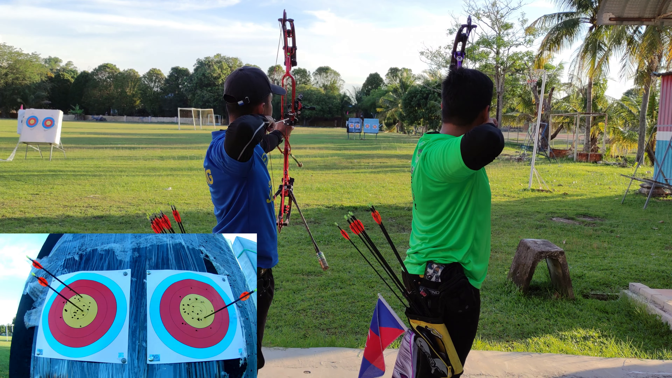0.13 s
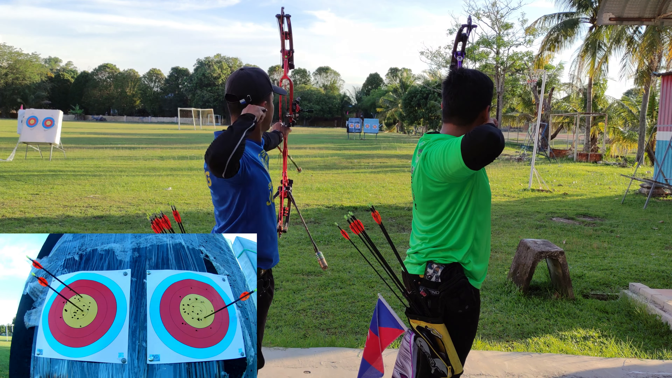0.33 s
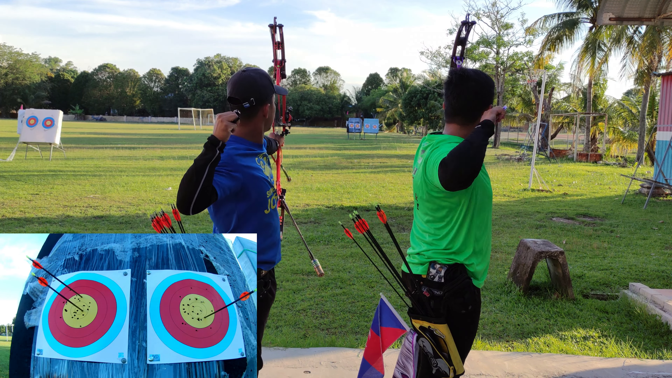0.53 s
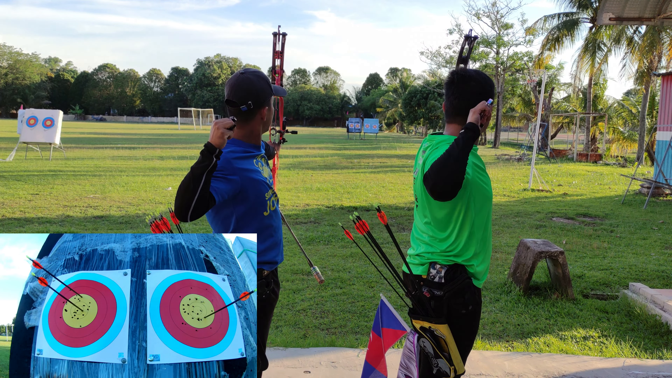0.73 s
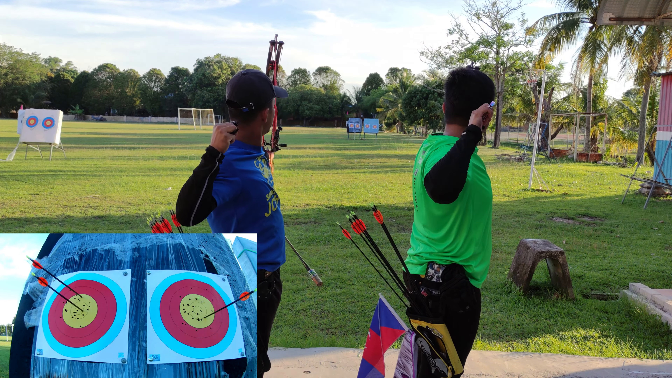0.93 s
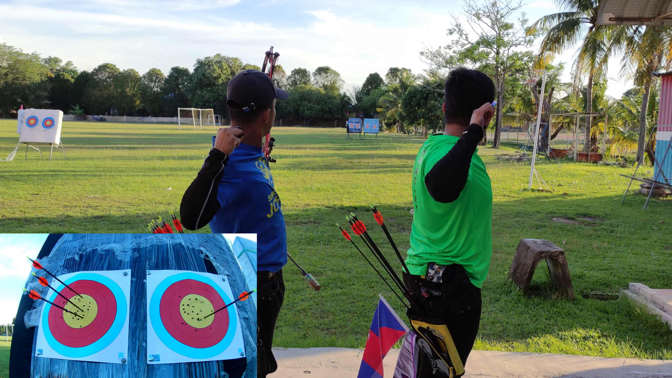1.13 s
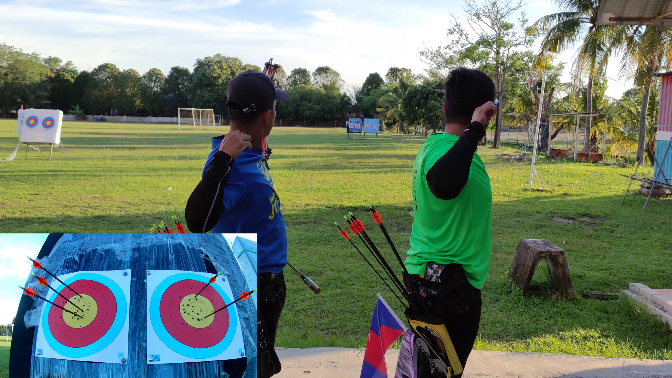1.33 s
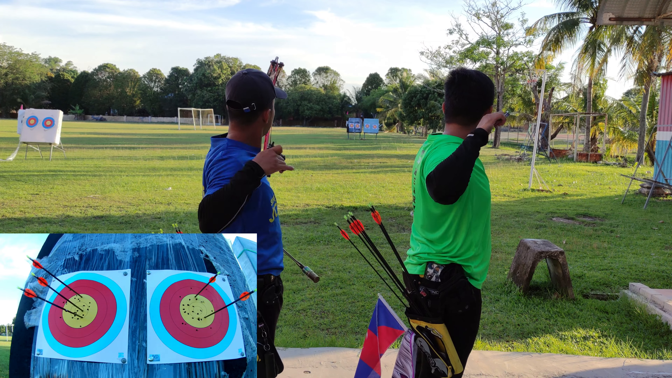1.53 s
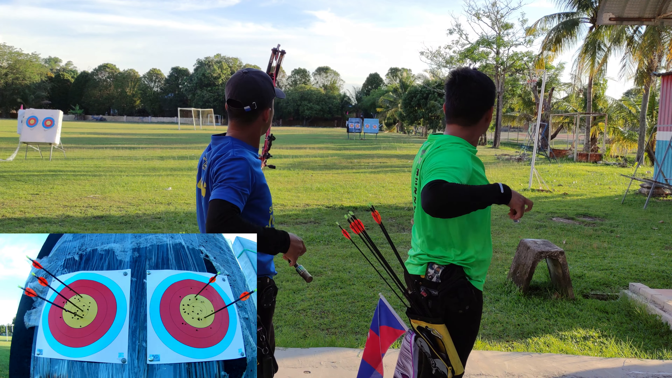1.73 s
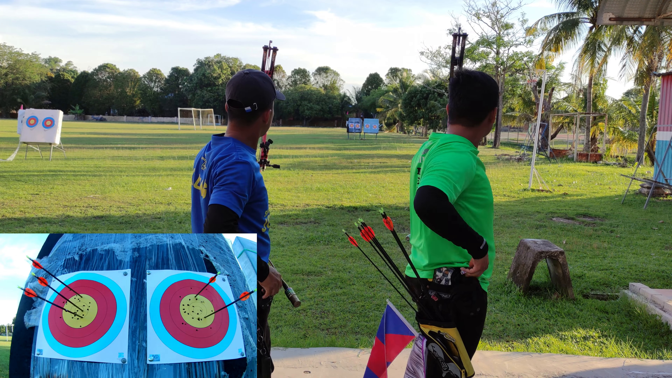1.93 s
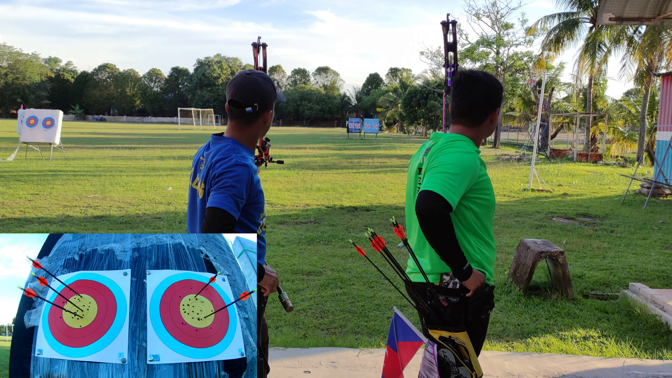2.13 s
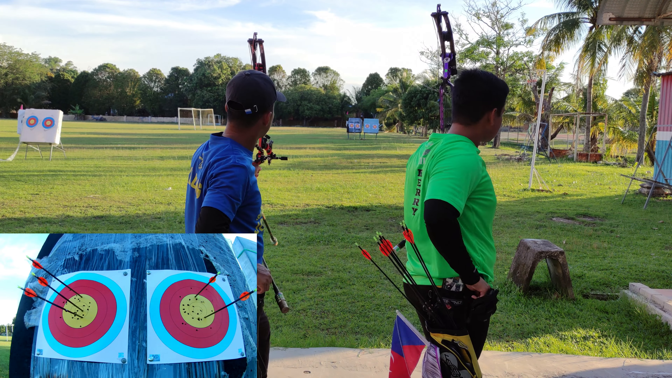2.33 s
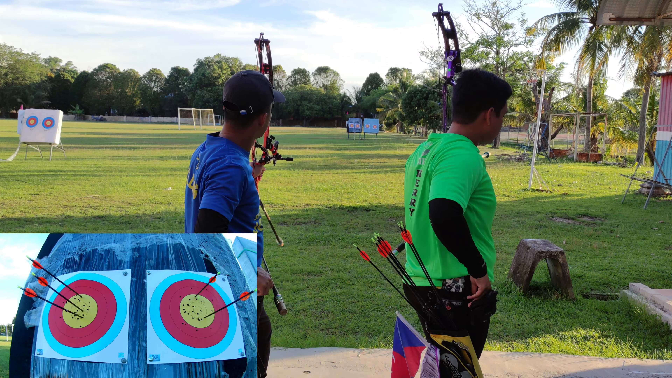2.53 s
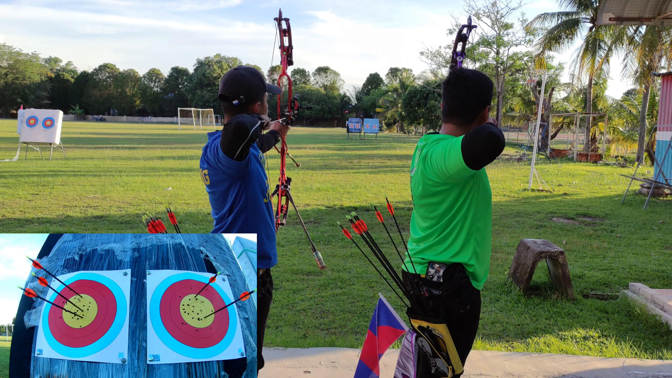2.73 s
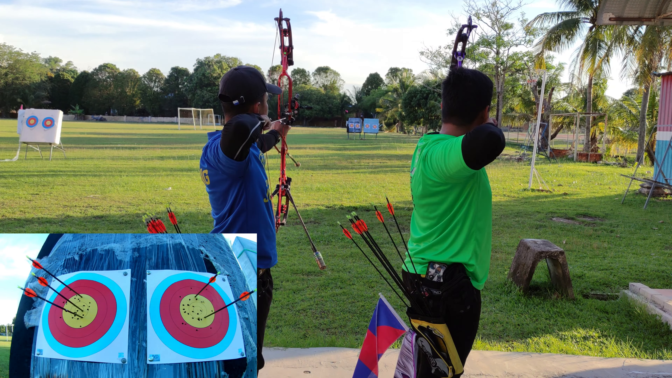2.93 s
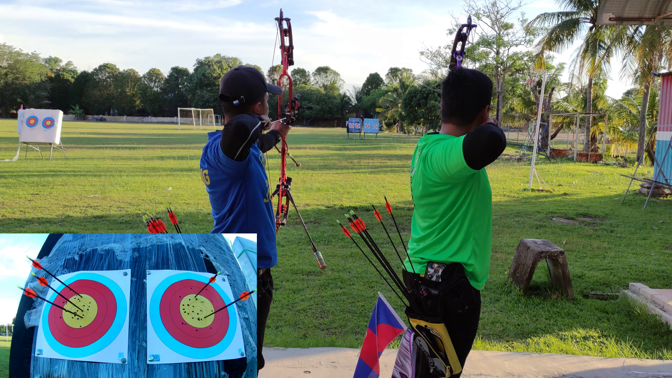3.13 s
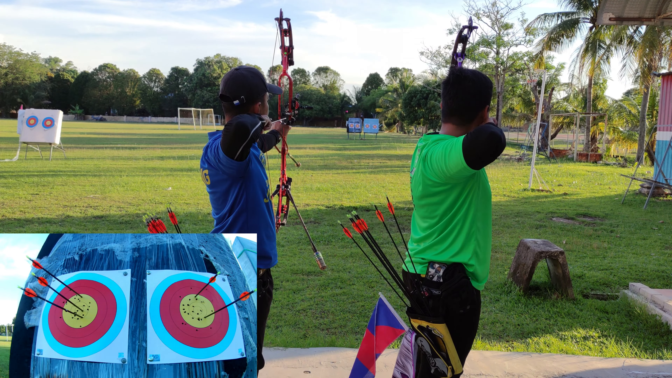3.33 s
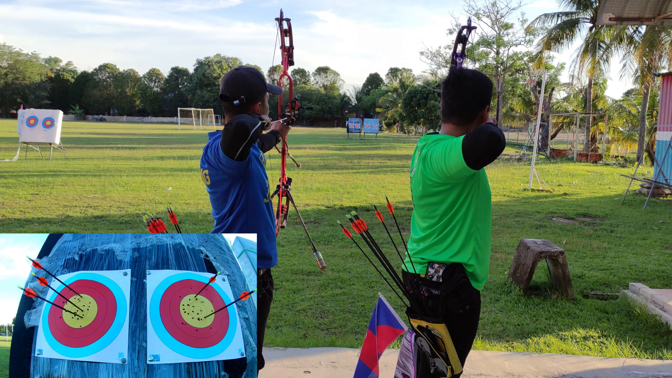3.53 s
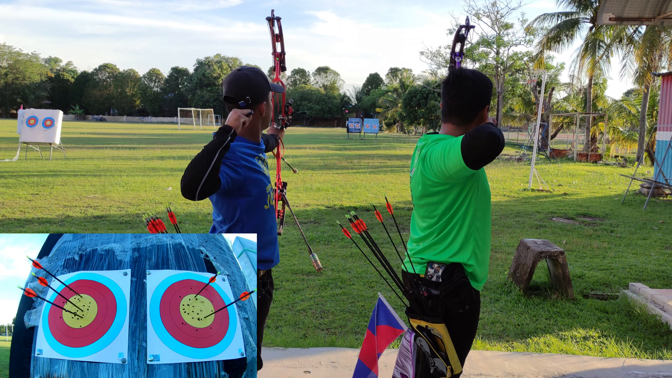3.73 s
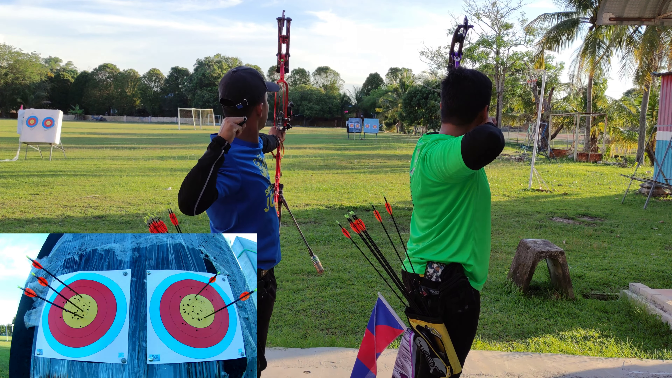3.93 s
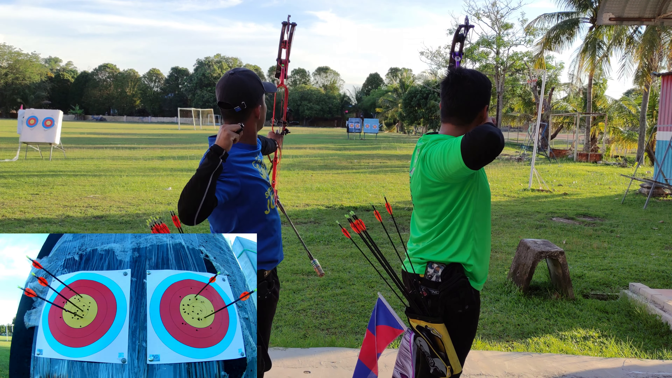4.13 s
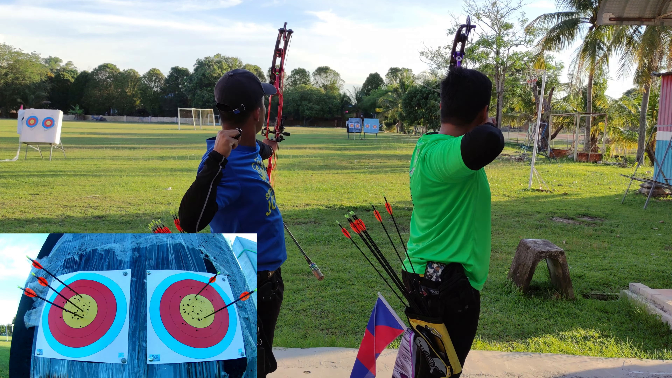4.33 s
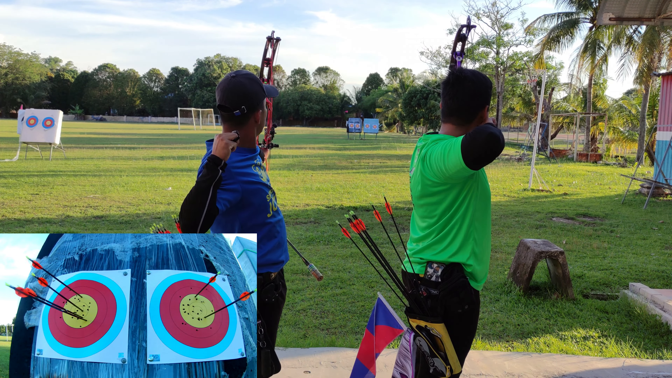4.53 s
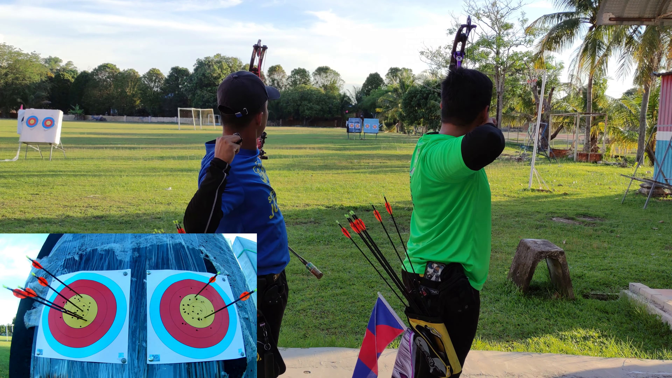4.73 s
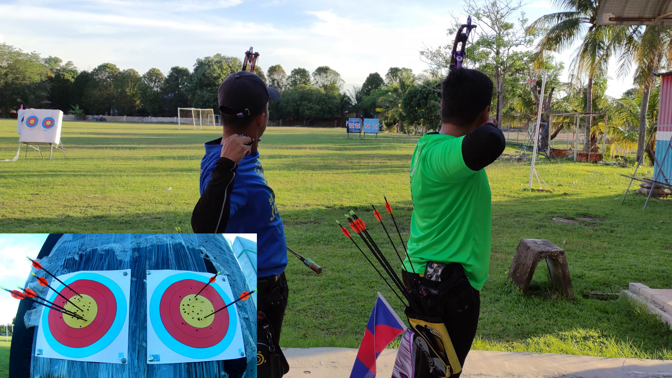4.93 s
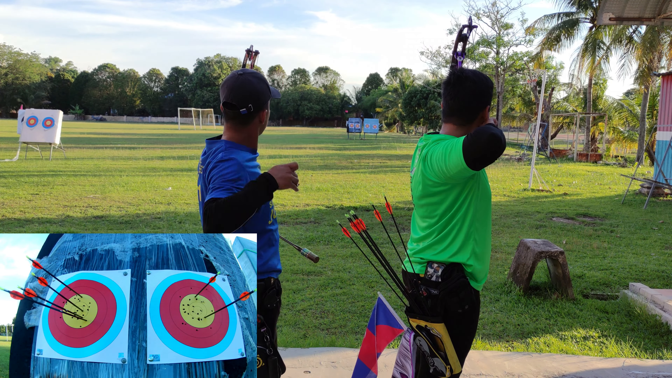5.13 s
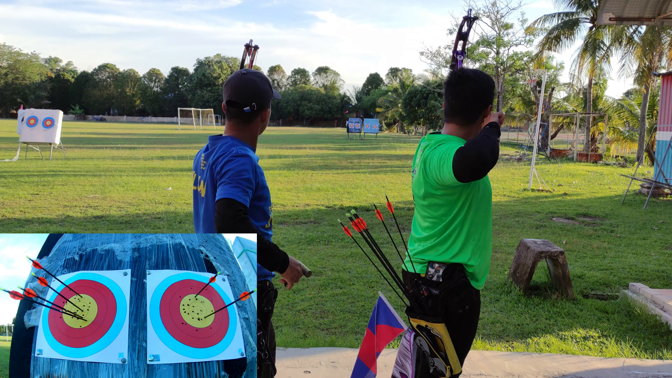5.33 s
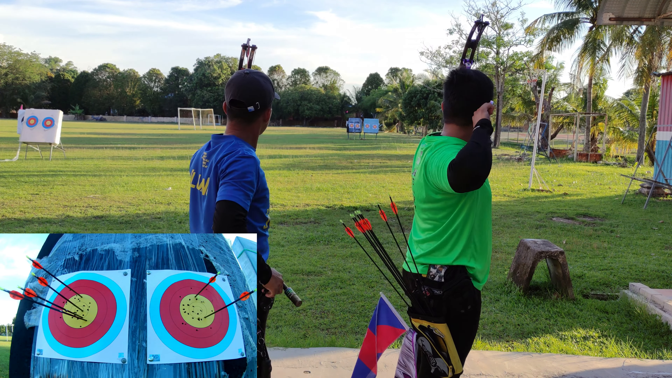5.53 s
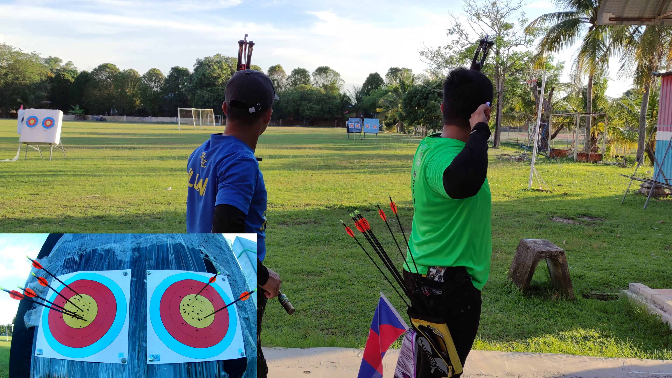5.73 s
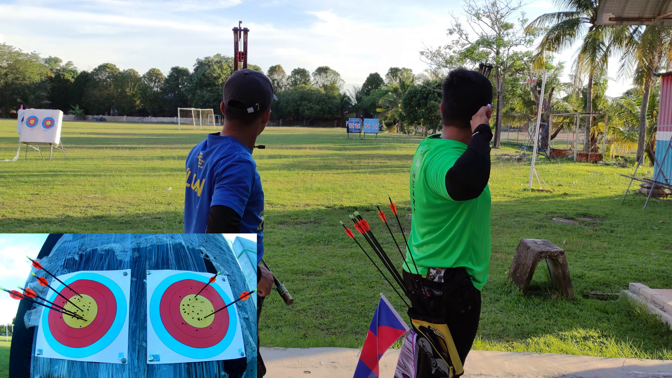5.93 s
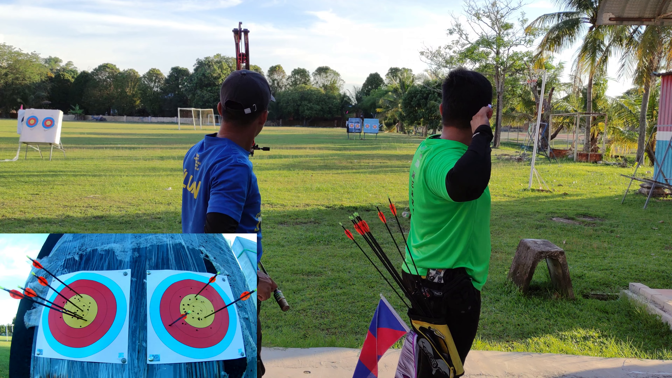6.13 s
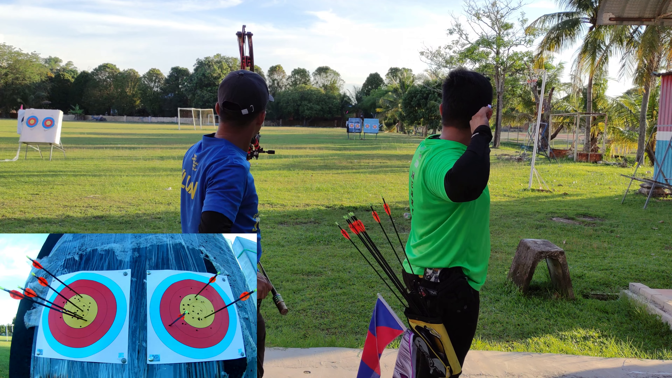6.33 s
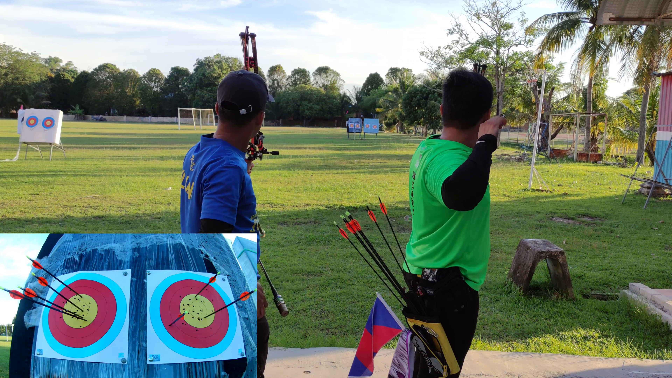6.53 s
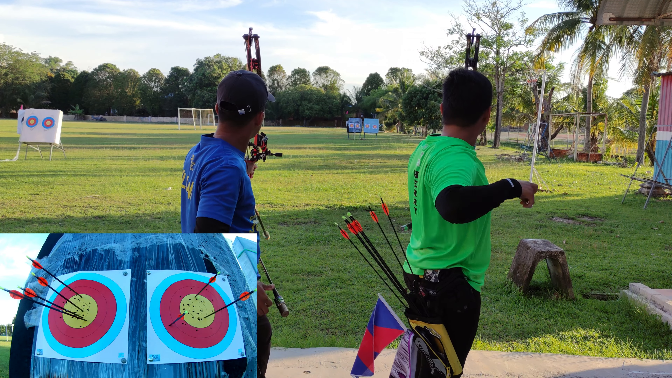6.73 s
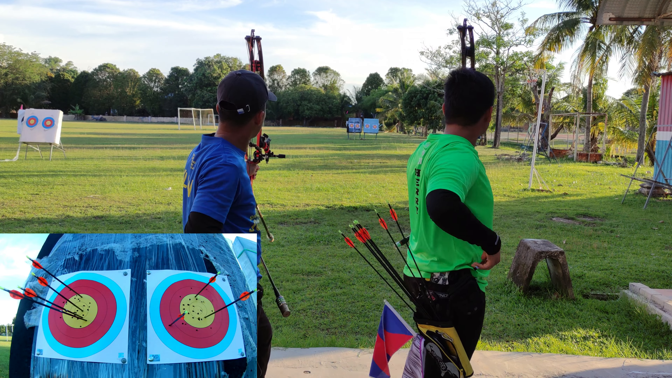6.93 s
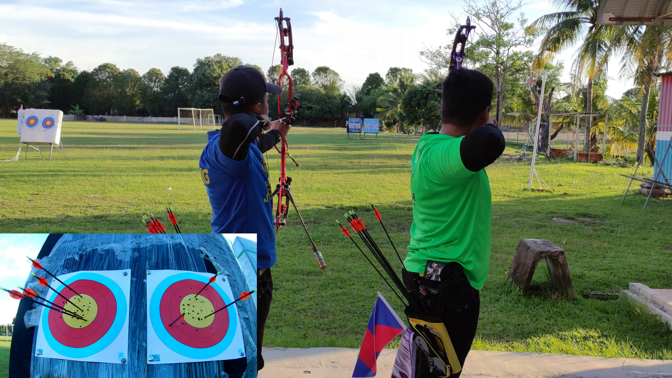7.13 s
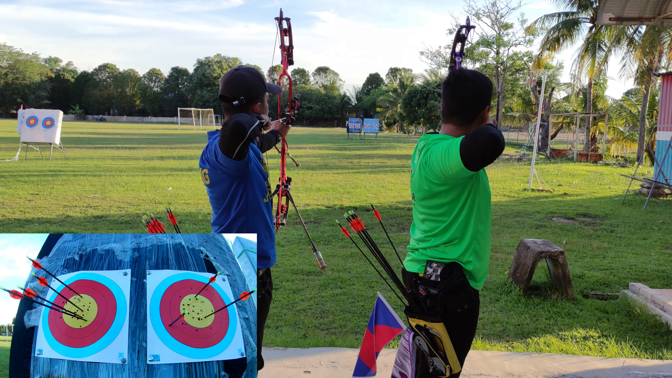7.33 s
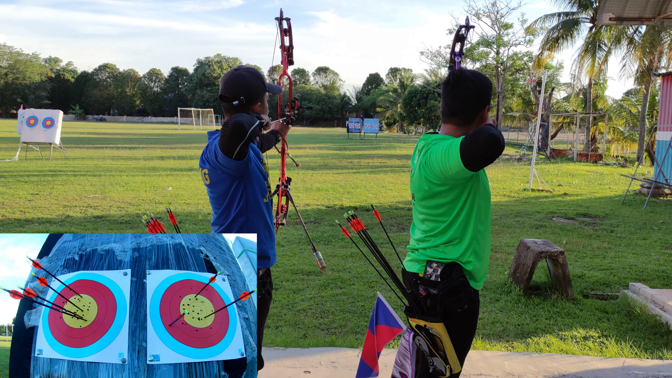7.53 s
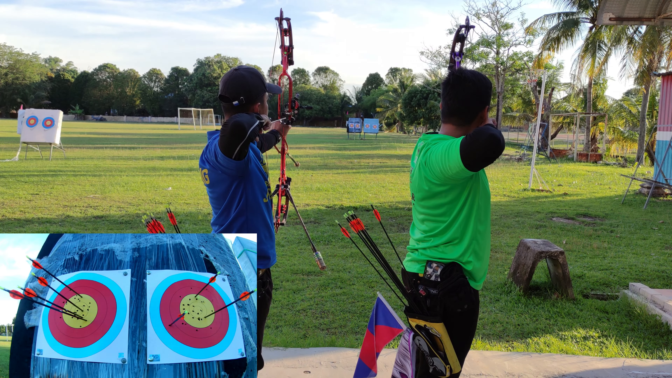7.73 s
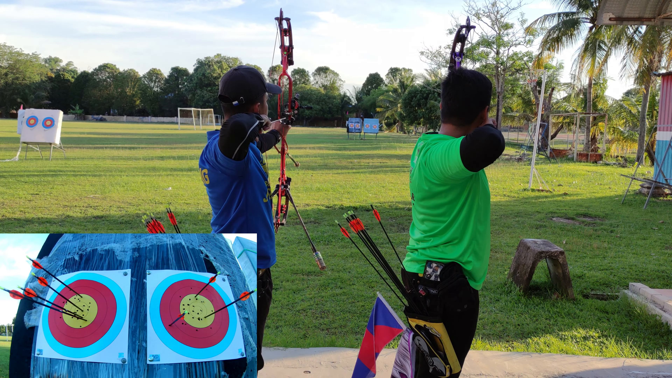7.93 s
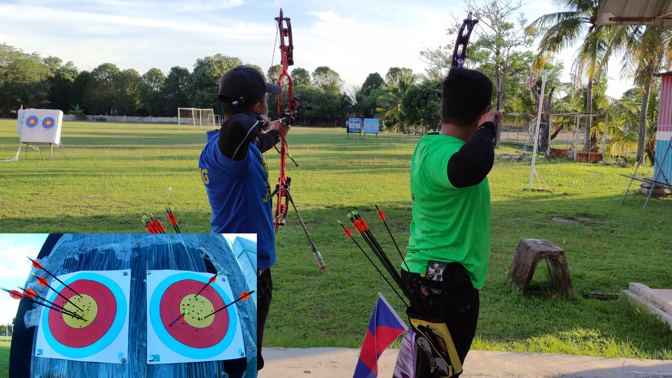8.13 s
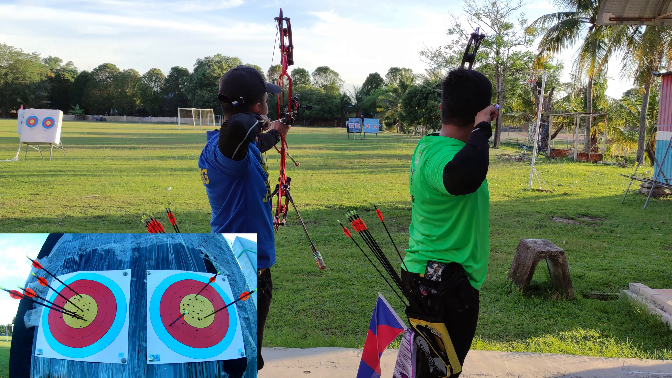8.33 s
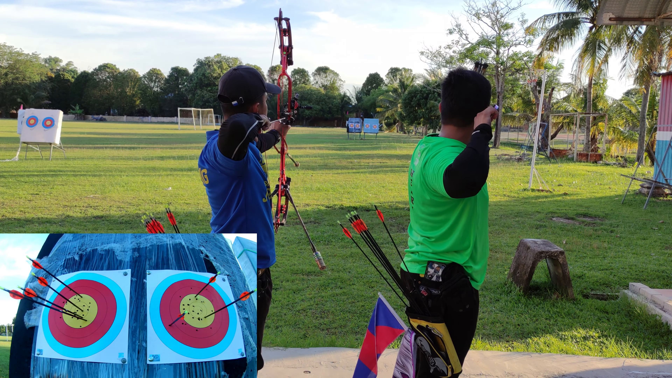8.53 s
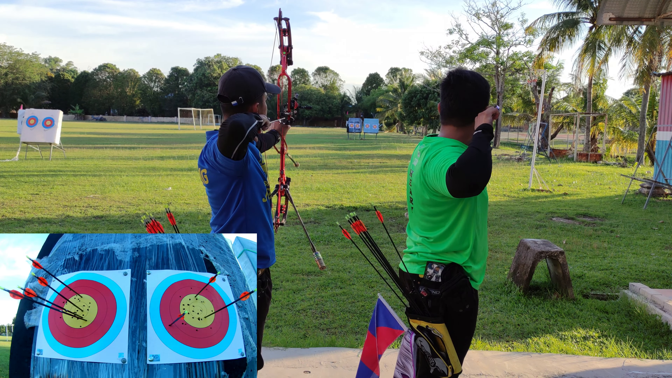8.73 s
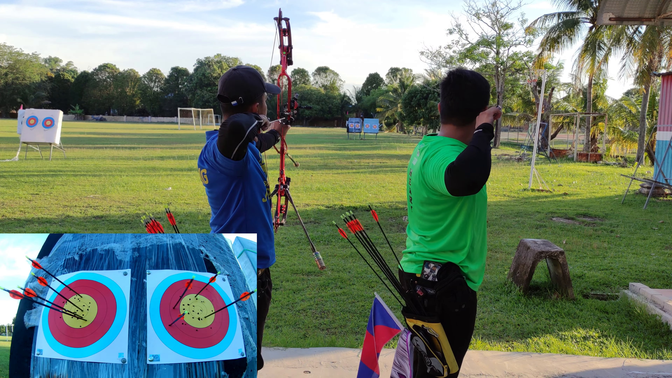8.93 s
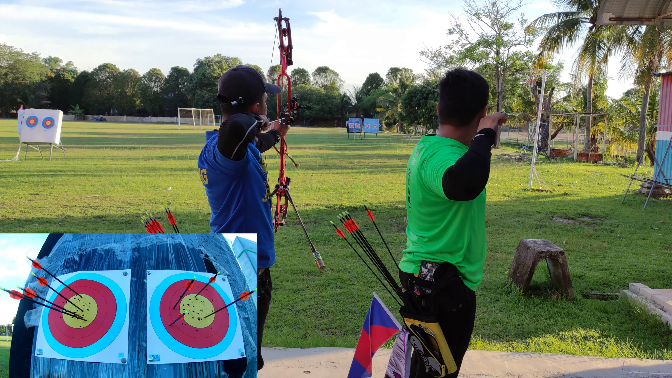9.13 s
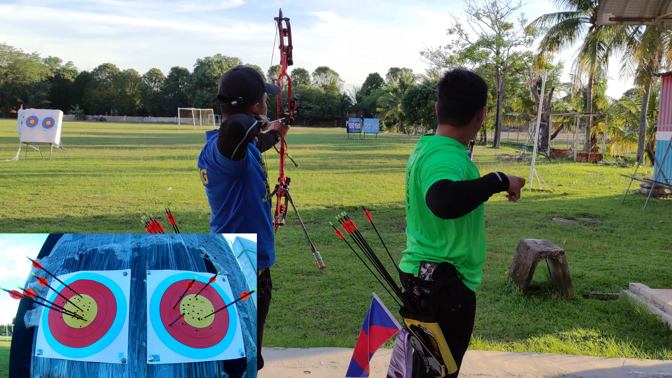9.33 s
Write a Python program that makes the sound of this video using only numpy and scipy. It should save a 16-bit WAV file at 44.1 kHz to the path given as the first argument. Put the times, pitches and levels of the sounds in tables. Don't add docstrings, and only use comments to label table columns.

```python
import sys
import numpy as np
from scipy import signal
from scipy.io import wavfile

SR = 44100
rng = np.random.default_rng(int(sys.argv[2]) if len(sys.argv) > 2 else 0)


def waveform_to_disk(signal):
    frames = np.transpose(np.atleast_2d(signal))
    scaled = np.clip(frames, -1, 1) * 32767
    samples = np.round(scaled).astype(np.int16)
    wavfile.write(sys.argv[1], SR, samples)


def gain_from_decibels(decibels):
    exponent = np.asarray(decibels, float) / 20
    return 10 ** exponent


N = 418509


def rms_one(x):
    return x / np.sqrt(np.mean(x ** 2) + 1e-20)


def in_time(rows):
    s, *columns = np.transpose(rows)
    return [np.interp(np.arange(N) / SR, s, c) for c in columns]


def at_hz(points, hz):
    points = np.array(points)
    return np.interp(np.log(hz), np.log(points[:, 0]), points[:, 1])


def drift(rate):
    r = np.exp(-80 * np.pi * rate / SR)
    white = rng.standard_normal(N // 40 + 2002)
    slow = signal.lfilter([1], [1, -2 * r, r * r], white)[2000:]
    return np.interp(np.arange(N) / 40, np.arange(len(slow)), rms_one(slow))


def noise_bank():
    edges = 20 * 2 ** (np.arange(31) / 3)
    white = rng.standard_normal((2, 2, N))
    bands = []
    for k, pair in enumerate(zip(edges, edges[1:])):
        band_pass = signal.butter(2, pair, "band", fs=SR, output="sos")
        bands.append(signal.sosfilt(band_pass, white[k % 2]))
    return np.sqrt(edges[1:] * edges[:-1]), np.array(bands, np.float32)


def colour(bank, spectrum, alike, lean_db=0):
    hz = bank[0]
    inside = (hz > spectrum[0][0] / 1.13) & (hz < spectrum[-1][0] * 1.13)
    gain = inside * gain_from_decibels(at_hz(spectrum, hz))
    gain = gain / np.sqrt(np.sum(gain ** 2 * hz * .2316 * 2 / SR))
    c = np.clip(at_hz(alike, hz), -.9, 1)
    mix = np.sqrt(np.array([[1 + c, 1 - c], [1 + c, 1 - c]]) / 2)
    mix = mix * np.array([[1, 1.0], [1, -0.96]])[:, :, None]
    return mix * gain * gain_from_decibels(np.array([.5, -.5])[:, None, None] * lean_db)


def steady(bank, spectrum, patchy_db, lean_db=0):
    # f/Hz, correlation/1
    field_alike = [(60, 0.91), (130, 1), (290, 0.86), (640, 0.5), (1410, 0.07), (3100, 0.11), (6820, 0.012),
                   (15000, 0.1)]
    mix = colour(bank, spectrum, field_alike, lean_db)
    out, together = 0, drift(1.5)
    for k in np.flatnonzero(mix[0, 0]):
        level_db = patchy_db * (0.67 * together + drift(13))
        out = out + mix[:, :, k] @ bank[1][k] * gain_from_decibels(level_db)
    return np.roll(out, rng.integers(N), axis=1)


def add(out, s, x):
    i = round(s * SR)
    out[..., i:i + x.shape[-1]] += x[..., :N - i]


def puff(bank, spectrum, t60, rise, alike=None, lean_db=0):
    # f/Hz, correlation/1
    near_alike = [(60, 0.97), (130, 0.98), (290, 0.91), (640, 0.82), (1410, 0.43), (3100, -0.11),
                  (6820, -0.23), (15000, -0.19)]
    # f/Hz, level/dB
    near_lean = [(60, -0.5), (110, -0.5), (200, -1), (380, 0), (700, -1.5), (1290, 1), (2380, -1.5),
                 (4400, -8), (8120, 3), (15000, -10)]
    t = np.arange(round((1.1 * np.max(t60) + .01) * SR)) / SR
    likeness = near_alike if alike is None else alike
    mix = colour(bank, spectrum, likeness, lean_db + at_hz(near_lean, bank[0]))
    used = np.flatnonzero(mix[0, 0])
    decay = gain_from_decibels(-60 * t / (t60 + 0 * bank[0])[used, None])
    start = rng.integers(SR, N - SR)
    bands = bank[1][used, :, start:start + len(t)] * ((1 - np.exp(-t / rise)) * decay)[:, None]
    return np.einsum("cmb,bmt->ct", mix[:, :, used], bands)


def struck(modes, spread_db, soft=0.0, mixed=True):
    t = np.arange(round(.2 * SR)) / SR
    hz, db, t60 = np.transpose(modes)[:, :, None]
    luck = rng.standard_normal((3, len(modes), 1))
    sign = np.where(mixed, np.sign(luck[2]), 1)
    waves = sign * np.sin(2 * np.pi * hz * (1 + 0.024 * luck[1]) * t)
    ring = np.sum(gain_from_decibels(db + spread_db * luck[0] - 60 * t / t60) * waves, axis=0)
    return ring * (1 - np.exp(-t / (soft + 1e-5)))


def glide(first_hz, last_hz, fall, length, rough):
    t = np.arange(round(.1 * SR)) / SR
    white = rng.standard_normal((2, len(t) + 200))
    wobble = signal.lfilter([1], [1, -1.9, .9025], white)[:, 200:]
    wobble = rough * rms_one(wobble) * (1 - np.exp(-t / 0.00055))
    hz = (last_hz + (first_hz - last_hz) * np.exp(-t / fall)) * (1 + 0.44 * wobble[0])
    fade_db = -9 * t / length - 34 * (t / length) ** 2
    return np.sin(2 * np.pi * np.cumsum(hz) / SR) * gain_from_decibels(fade_db) * (1 + wobble[1])


def bows(bank):
    # t/s, trigger level/dB, thump level/dB, roof tail level/dB
    releases = [
        (0.3564, -27, -31, -30.5),
        (0.5125, -25.5, -28, -27),
        (3.6657, -26, -29, -31),
        (5.3631, -25.5, -28, -27.5),
        (8.0965, -25.5, -29, -27),
    ]
    whose = [0, 1, 0, 1, 1]
    # f/Hz, level/dB, t60/s
    bow_modes = [
        [(96, -1.5, 0.034), (243.5, 1, 0.13), (347, -33, 0.0091), (480, -0.5, 0.026), (677, 1.5, 0.036),
         (973, -7, 0.03), (1300, -8, .008)],
        [(85.4, 1.5, 0.026), (234, -5.5, 0.22), (334, 2, 0.05), (517, -1, 0.043), (760, 0.5, 0.025),
         (1036, -1.5, 0.014), (1500, -3, 0.006)],
    ]
    # t after travel/s, level/dB, push or pull/1
    blows = [
        (.0010, -8, -1),
        (.0036, -6, 1),
        (.0054, 2, -1),
        (.0146, -8, -1),
    ]
    # f/Hz, level/dB per Hz
    trigger = [(880, -48), (1500, -6), (2160, -1), (3960, 1), (6000, -3), (6760, 2.5), (8740, -1),
               (16000, -25.5)]
    # f/Hz, level/dB, t60/s
    sear = [(7000, 0, .007), (6500, -4, .007), (4300, -12, .007)]
    # f/Hz, level/dB, t60/s
    jaw = [(2250, 4, 0.26), (3340, -14, 0.085), (5950, -9.5, 0.19), (7300, -10, 0.027), (8700, -1, 0.082),
           (13900, -6, .1)]
    # f/Hz, level/dB per Hz
    rush = [(180, -36), (300, 16.5), (425, 2.5), (502, 9), (885, -1), (978, 2), (1280, -6.5), (2280, -6.5),
            (4370, -16.5), (8090, -15), (12100, -40.5), (14700, -31), (16000, -32)]
    # f/Hz, t60/s
    roof_t60 = [(300, 0.3), (1500, 0.35), (5000, 0.6), (9000, 0.46), (16000, .3)]
    # t60 factor/1, tilt/dB per octave
    slap_place = [(.87, 2.5), (1.05, 4)]
    travel_s = .0154
    out = np.zeros((2, N))
    for (s, db, thump_db, tail_db), bow in zip(releases, whose):
        longer, tilt_db = slap_place[bow]
        add(out, s, gain_from_decibels(db - 13.5) * puff(bank, trigger, .025, .0005))
        add(out, s, gain_from_decibels(db - 8) * puff(bank, trigger, 0.18, 0.0012))
        add(out, s + 0.0012, gain_from_decibels(db - 27.5) * struck(jaw, 0.84) * gain_from_decibels([[-1.5], [1.5]]))
        click = struck(sear, 1.5, soft=.0003) * gain_from_decibels([[2.5], [-2.5]])
        add(out, s + .0017, gain_from_decibels(db - 9.5 + 5.5 * bow) * click)
        limbs = struck(bow_modes[bow], 1.5, soft=0.0002, mixed=False)
        for lag, blow_db, way in blows:
            add(out, s + travel_s + lag, gain_from_decibels(thump_db + blow_db) * np.sign(way) * limbs)
        slap = [(hz, level + tilt_db * np.log2(hz / 3000)) for hz, level in rush]
        tail = puff(bank, slap, longer * at_hz(roof_t60, bank[0]), 0.0021)
        add(out, s + travel_s + .003, gain_from_decibels(tail_db) * tail)
    return out


def target(bank):
    # t/s, entry level/dB, drive-in/s, stop level/dB, butt ring f/Hz
    hits = [
        (1.1373, 4.5, 0.0041, -2.5, 540),
        (1.2496, -2, .0042, 0, 400),
        (4.44715, 5.5, .0060, -3.5, 330),
        (6.0978, 3, .0045, -1.5, 470),
        (8.8335, 5, .0051, -3, 480),
    ]
    # free shaft f/Hz, gripped shaft f/Hz, ring/s, paper crack level/dB, stop f/Hz
    entries = [(1720, 1250, .008, -16, 800), (1900, 1450, .0035, -20, 1000), (1700, 1150, .0075, -17, 750),
               (1550, 1050, .0045, -14, 800), (1600, 950, .0065, -16.5, 850)]
    # f/Hz, level/dB, t60/s
    frame = [(127, -11, 0.1), (292.2, -19.5, 0.2), (398, -5.5, 0.065), (614, -9, 0.059), (865, -3.5, 0.035),
             (1065, -2.5, 0.024), (1265, -14.5, 0.028), (1640, -30, 0.1), (1800, -14, 0.023),
             (2078, -38.5, 0.025), (2560, -44, 0.054), (2859, -24.5, 0.021)]
    # f/Hz, level/dB per Hz
    foam = [(150, -6), (400, 3.5), (900, -0.5), (1800, -4.5), (2800, -22.5), (5000, -45)]
    # f/Hz, level/dB per Hz
    crack = [(1180, -36), (2000, 0.5), (2960, -14.5), (4600, -10.5), (8050, -41.5), (10400, -42),
             (16000, -58.5)]
    # f/Hz, level/dB, t60/s
    face = [(2150, 0, .012), (2600, -3, .012), (3300, -8, .012), (4050, -4, .014), (4700, -5, .014),
            (5300, -9, .012)]
    out = np.zeros(N)
    for hit, entry in zip(hits, entries):
        s, db, delay, stop_db, ring_hz = hit
        free_hz, gripped_hz, entry_s, crack_db, stop_hz = entry
        add(out, s, gain_from_decibels(db) * glide(free_hz, gripped_hz, .002, entry_s, rough=0.28))
        add(out, s + delay, gain_from_decibels(stop_db) * glide(stop_hz, .25 * stop_hz, 0.0007, 0.006, rough=0.2))
        butt_ring = glide(ring_hz, 0.75 * ring_hz, 0.011, 0.036, rough=0.49)
        add(out, s + delay, gain_from_decibels(stop_db - 13.5) * butt_ring)
        add(out, s + .6 * delay, gain_from_decibels(-13) * struck(frame, 2.6, soft=0.0002))
        crush = puff(bank, foam, 0.049, 0.00033, alike=[(20, 0.72), (2e4, 0.81)])[0]
        add(out, s + .001, gain_from_decibels(-14) * crush)
        tear = puff(bank, crack, .015, 0.00027, alike=[(20, 0.97), (2e4, 0.69)])[0]
        add(out, s, gain_from_decibels(crack_db) * tear)
        add(out, s, gain_from_decibels(crack_db - 7) * struck(face, 1.5, soft=0.0002))
    overloaded = 1.166 * np.tanh(out / 1.174)
    return signal.lfilter([.6], [1, -.4], overloaded)


def far_hits(bank):
    # t/s, peak level/dB, tree echo level/dB, echo colour f/Hz
    arrivals = [
        (1.1928, -30, -47.5, 7300),
        (1.3059, -35.5, -51, 4300),
        (4.5021, -29.5, -43.5, 5120),
        (6.1529, -33, -46, 4830),
        (8.8869, -32, -44.5, 4200),
    ]
    # f/Hz, level/dB per Hz
    tick_spectrum = [(700, -4), (1600, 5), (3000, -9), (4700, -2), (6300, -8), (7900, -4), (9500, -22),
                     (16000, -40)]
    # f/Hz, level/dB per Hz
    trees = [(500, 6), (2000, 3), (3000, -14), (4600, -11.5), (6800, -16.5), (9000, -22.5), (16000, -44)]
    out = np.zeros((2, N))
    r = np.exp(-np.pi * 700 / SR)
    for s, db, echo_db, hz in arrivals:
        tick = puff(bank, tick_spectrum, .009, 0.00017, alike=[(20, 1.0), (2e4, 0.81)])
        add(out, s, gain_from_decibels(db + 5.0) * tick)
        echo = puff(bank, trees, 0.67, 0.0055)
        poles = [1, -2 * r * np.cos(2 * np.pi * hz / SR), r * r]
        ringing = signal.lfilter([(1 - r * r) / 2, 0, (r * r - 1) / 2], poles, echo)
        add(out, s + 0.0033, gain_from_decibels(echo_db) * (echo + gain_from_decibels(4.5) * ringing))
    return out


def rattle(bank):
    # t/s, peak level/dB, shaft pitch f/Hz, treble level/dB
    knocks = [(2.0341, -34, 2130, -42.5), (2.1665, -41.5, 2480, -56), (2.2736, -49, 2510, -69),
              (2.2992, -46.5, 2340, -62), (2.3444, -48, 2430, -72), (2.4015, -46, 1980, -64),
              (2.4194, -45, 1970, -68), (2.4938, -37.5, 2780, -54), (2.5227, -40, 2340, -62),
              (2.552, -45, 2410, -67.5), (5.324, -49, 2330, -58), (5.6003, -40, 2820, -48),
              (6.0128, -47, 2770, -62), (6.0268, -40.5, 1915, -57), (6.2127, -38, 2390, -56),
              (6.2158, -36, 2420, -58), (6.2303, -33, 2300, -48), (6.2385, -35, 2400, -44),
              (6.2435, -36, 2400, -52), (6.2505, -40, 2350, -54), (6.3045, -45, 2700, -62),
              (6.5145, -32, 2300, -48), (6.575, -47, 2360, -63), (6.6135, -35, 2300, -47),
              (6.632, -44, 2300, -60), (6.5084, -38, 2740, -57), (6.5117, -36, 2370, -51),
              (6.5836, -48, 2250, -57), (6.6092, -34, 2410, -47), (6.6445, -30.5, 2030, -46),
              (6.6520, -30.5, 2100, -43), (6.673, -38, 2550, -58), (7.295, -53, 2040, -61),
              (7.6779, -54, 2156, -65), (9.4508, -42.5, 2140, -64.5)]
    # t/s, treble level/dB
    buckles = [(1.82, -52.5), (2.0488, -57), (5.289, -62), (5.845, -62), (6.8392, -64), (7.0982, -51.5),
               (7.1073, -48.5), (7.2444, -58.5), (7.7391, -58.5), (8.803, -52), (8.8616, -50),
               (9.4689, -56)]
    # pitch ratio/1, level/dB, t60/s
    shaft_modes = [(1, 4, 0.03), (1.35, -8, .03), (1.75, -8.5, 0.021), (2.4, -16, 0.019)]
    # f/Hz, level/dB, t60/s
    nock = [(8100, 0, .022), (7600, -6, .02), (6250, -8, .03)]
    # f/Hz, level/dB, t60/s
    quiver = [(3330, -3, .2), (3720, 0, .3), (1950, -6, .3)]
    # t/s, level/dB
    quiver_blows = [(6.6527, -55), (6.673, -58), (6.5117, -62)]
    knock_t60 = 0.045
    dull = [(1500, -7), (2300, 0), (3500, -6), (5500, -19.0)]
    bright = [(5000, -5.5), (6500, -4), (8000, 11.5), (10000, -17.5), (16000, -15.5)]
    ticks = [(s, db - 8, 2200, db) for s, db in buckles]
    out = np.zeros((2, N))
    for s, db, hz, treble_db in knocks + ticks:
        lean_db = 1 + 2 * rng.standard_normal()
        half = lean_db / 2
        shaft = [(ratio * hz, level_db, ring) for ratio, level_db, ring in shaft_modes]
        body = struck(shaft, 2.3, soft=.0008) * gain_from_decibels([[half], [-half]])
        add(out, s, gain_from_decibels(db - 4.5) * body)
        add(out, s, gain_from_decibels(db - 6.0) * puff(bank, dull, knock_t60, 0.00069, lean_db=lean_db))
        ping = struck(nock, 2.5, soft=.0006) * gain_from_decibels([[half + 2.5], [-half - 2.5]])
        add(out, s, gain_from_decibels(treble_db + 1.5) * ping)
        add(out, s, gain_from_decibels(treble_db - 1.5) * puff(bank, bright, knock_t60, 0.001, lean_db=lean_db))
        add(out, s, gain_from_decibels(db - 17.5) * puff(bank, dull, 0.33, .008))
        add(out, s, gain_from_decibels(treble_db - 7) * puff(bank, bright, 0.24, 0.016))
    for s, db in quiver_blows:
        add(out, s, gain_from_decibels(db) * struck(quiver, 1.5, soft=.001))
    return out


def drone(rows, orders, unsteady_db):
    hz, db = in_time(rows)
    t = np.arange(N) / SR
    phase = 2 * np.pi * np.cumsum(hz * (1 + .002 * unsteady_db * drift(4))) / SR
    tone = 0
    for k, level_db in orders:
        tone = tone + gain_from_decibels(level_db + unsteady_db * drift(4)) * np.sin(k * phase + k * k)
    gate = np.clip(np.minimum(t - rows[0][0], rows[-1][0] - t) / .02, 0, 1)
    return np.sqrt(2) * gain_from_decibels(db) * tone * gate


def engines():
    # from t/s, to t/s, first f/Hz, last f/Hz, loudest level/dB
    passing = [(.9, 2.67, 120, 104, -47.5), (2.69, 5.7, 75, 71, -48), (2.69, 7.14, 123, 118, -49),
               (2.69, 6.2, 146, 143, -55), (2.69, 4.3, 95, 102, -51), (4.9, 6.9, 92, 104, -52),
               (5.8, 7.14, 186, 178, -57), (7.15, 9.49, 65, 57, -50), (7.15, 9.49, 126, 114, -54),
               (7.15, 8.4, 212.7, 222, -57.5), (8.3, 9.49, 156, 154, -58), (8.9, 9.49, 234, 238, -59)]
    # t/s, turns f/Hz, level/dB
    motor = [(2.685, 80.0, -53), (4.0, 81.8, -53), (5.3, 83.6, -51), (6.3, 85.6, -49.5), (7.14, 86.2, -50)]
    # order/1, level/dB
    motor_orders = [(1, -1), (3, -11), (4, -16), (5, -15), (6, -15), (7, -13.5), (9, -21), (10, -22)]
    out = drone(motor, motor_orders, unsteady_db=2.0)
    for a, b, hz, last_hz, db in passing:
        edge_db = db - 2.5
        rows = [(a, hz, edge_db), ((a + b) / 2, (hz + last_hz) / 2, db), (b, last_hz, edge_db)]
        out = out + drone(rows, [(0.99, 0.014)], unsteady_db=3.0)
    return out


def insects():
    # t/s, level/dB
    chorus = [(0, -76.5), (.5, -77), (1.1, -70), (1.4, -77), (1.95, -73.5), (2.7, -78.5), (3.2, -78.5),
              (3.5, -73.5), (3.95, -77), (4.6, -77), (5.1, -77.5), (5.4, -75), (6.8, -75.5), (7.1, -81),
              (7.6, -71.5), (7.95, -76), (8.5, -73), (9.49, -73.5)]
    r, w = np.exp(-np.pi * 700 / SR), 2 * np.pi * 8050 / SR
    x = rng.standard_normal((2, N))
    for turn in range(2):
        x = signal.lfilter([1, 0, -1], [1, -2 * r * np.cos(w), r * r], x)
    flutter = gain_from_decibels(1.2 * drift(7) + 1.6 * drift(1.5))
    return rms_one(x) * gain_from_decibels([[2.5], [-2.5]]) * flutter * gain_from_decibels(in_time(chorus)[0] + 4.5)


def field(bank):
    starts_s = [0, 2.68, 7.145]
    # rumble level/dB, tyre level/dB, leaves level/dB, tyre fade/dB per s
    levels = [
        (-44, -47, -65.5, -0.7),
        (-44.5, -51.5, -67.5, 0),
        (-46.5, -56.5, -68.7, .1),
    ]
    # f/Hz, level/dB per Hz
    rumble = [(12, -44), (20, -15.5), (37, -8.5), (61, -5), (80, -2.5), (184, -10), (242, -14),
              (275, -18.5), (371, -28.5), (400, -27.5), (520, -53.5), (880, -120)]
    # f/Hz, level/dB per Hz
    tyres = [(200, -15.5), (350, -6), (600, -1.5), (950, 2), (1300, -2), (1800, -18), (2600, -24.5)]
    # f/Hz, level/dB per Hz
    leaves = [(1000, -7.5), (2000, 3.5), (3200, -5.5), (5000, -8.5), (7000, -10), (9500, -17.5),
              (12000, -15), (17000, -17.5)]
    t = np.arange(N) / SR
    take = np.searchsorted(starts_s, t, side="right") - 1
    rumble_db, tyres_db, leaves_db, fades_db = np.transpose(levels)[:, take]
    middle = (np.array(starts_s) + np.append(starts_s[1:], N / SR))[take] / 2
    road = gain_from_decibels(rumble_db) * steady(bank, rumble, 2.52)
    road = road + gain_from_decibels(tyres_db + 0.8 - fades_db * (t - middle)) * steady(bank, tyres, 0.5)
    rustle = gain_from_decibels(leaves_db + 4.0) * steady(bank, leaves, .4, lean_db=-1.6)
    return road + rustle + insects() + engines()


def scene():
    bank = noise_bank()
    return bows(bank) + target(bank) + far_hits(bank) + rattle(bank) + field(bank)


def band_limit(x):
    return signal.sosfilt(signal.butter(12, 16330, fs=SR, output="sos"), x)


def record(dry):
    low_pass = signal.cheby2(12, 50, 16600, fs=SR, output="sos")
    return band_limit(signal.sosfilt(low_pass, np.clip(dry, -1, 1)))


dry = scene()
out = record(dry)
waveform_to_disk(out)
```